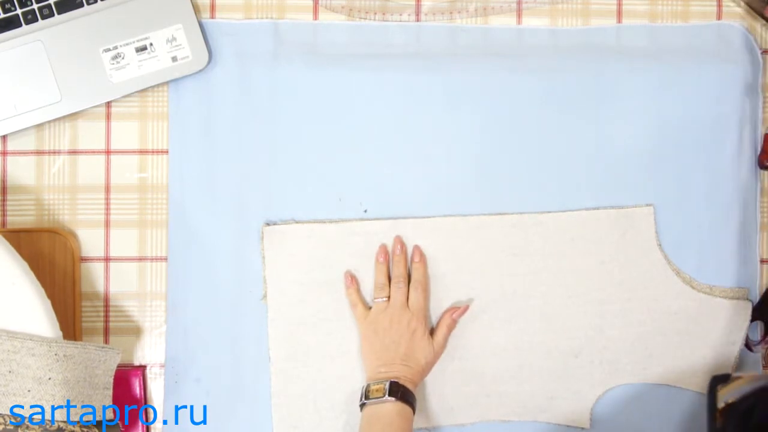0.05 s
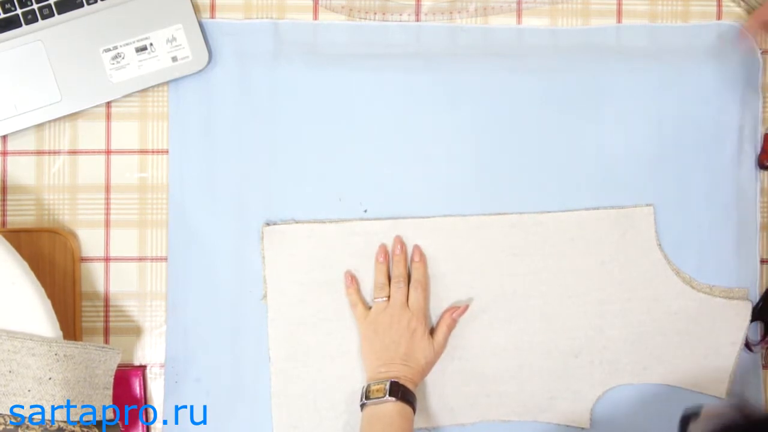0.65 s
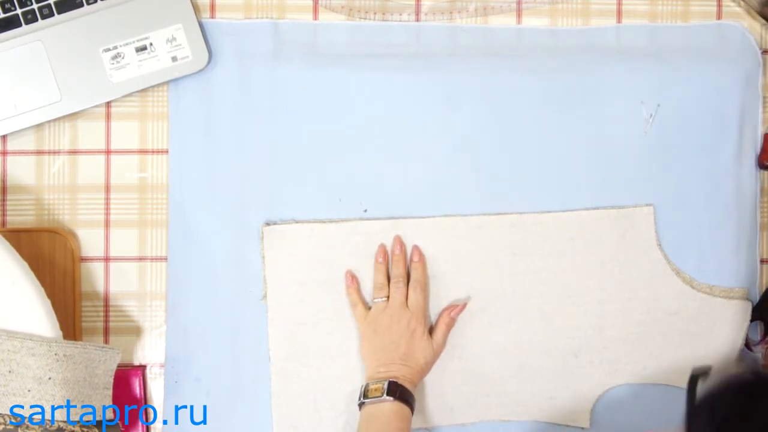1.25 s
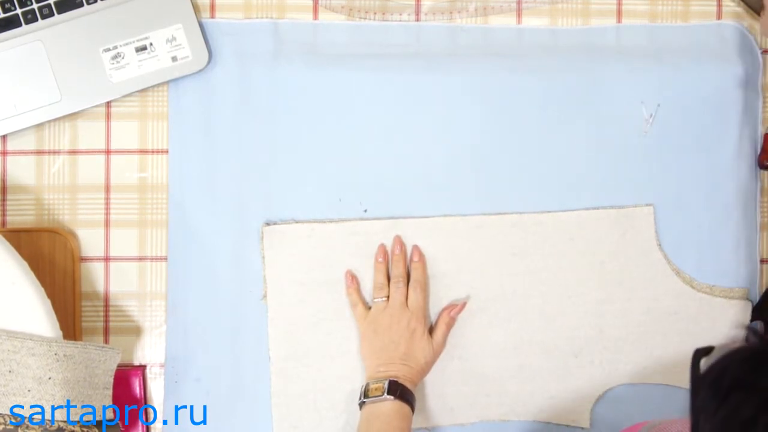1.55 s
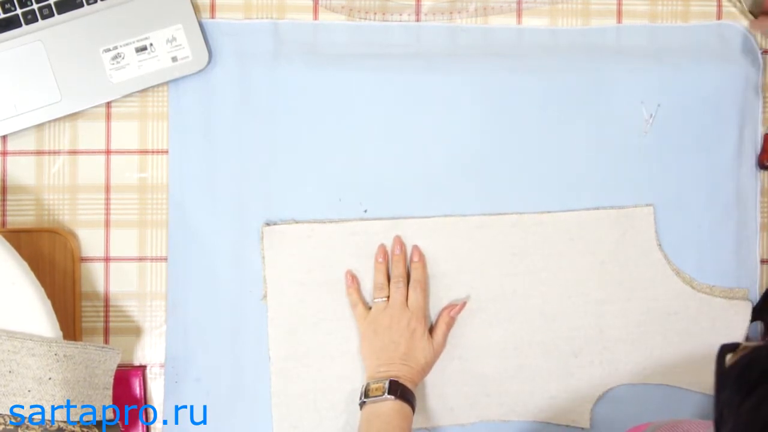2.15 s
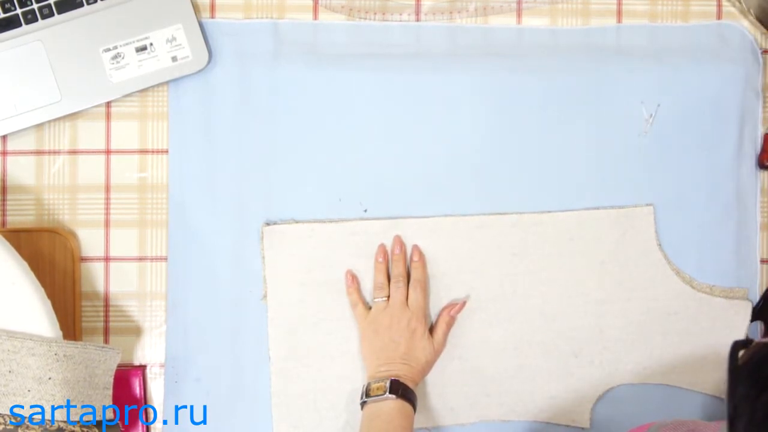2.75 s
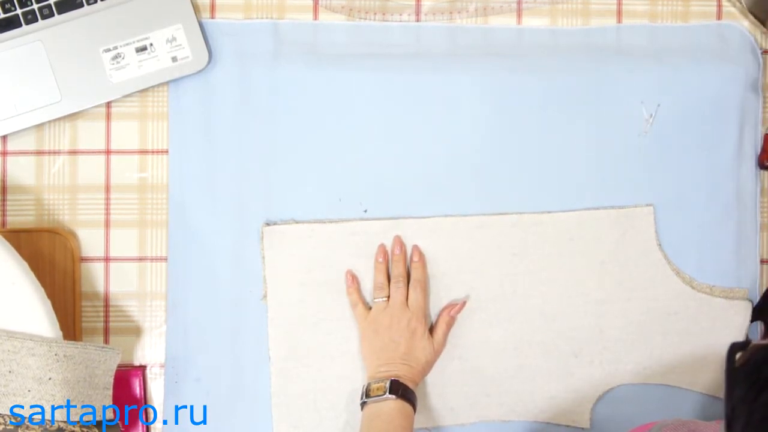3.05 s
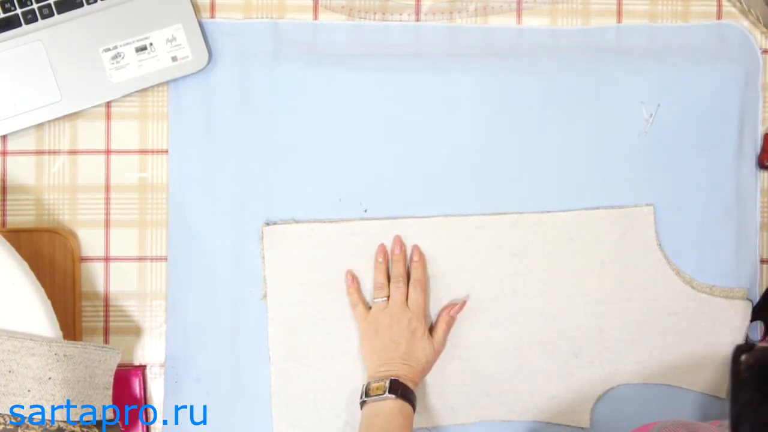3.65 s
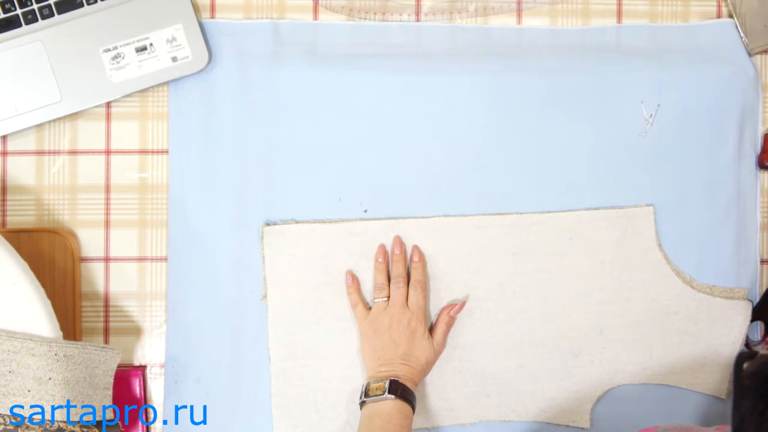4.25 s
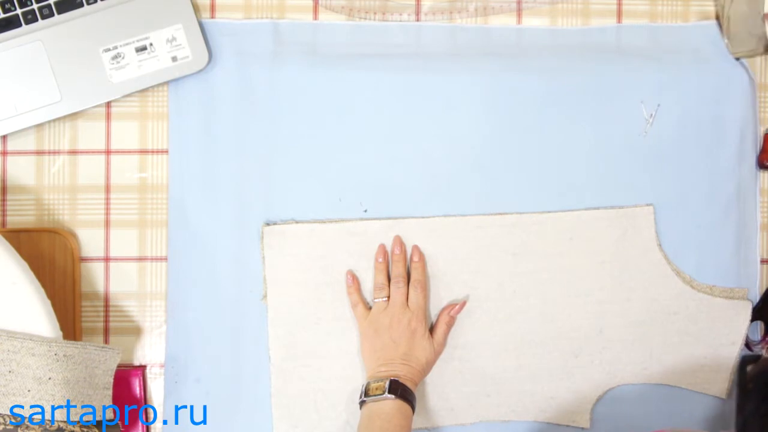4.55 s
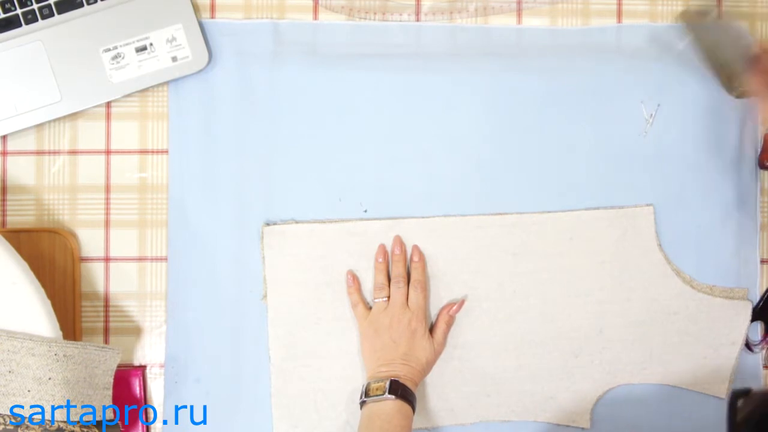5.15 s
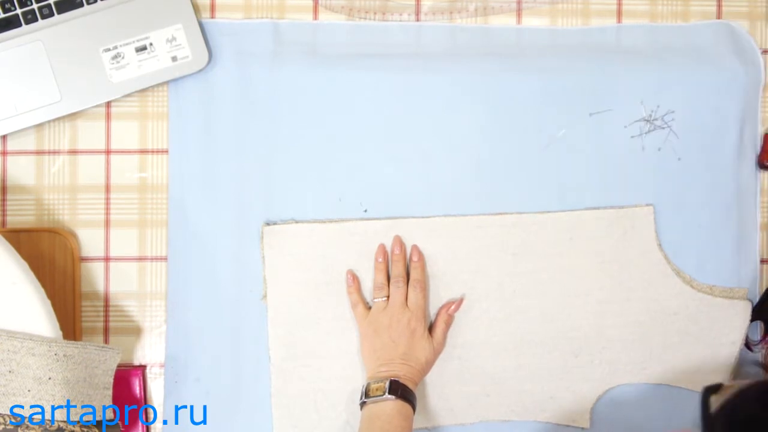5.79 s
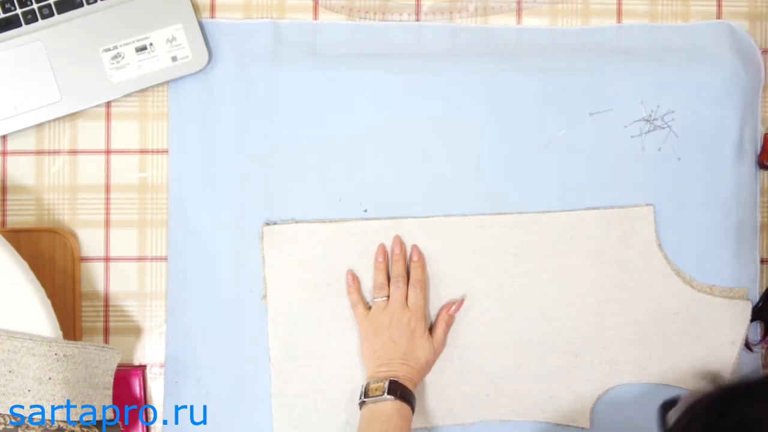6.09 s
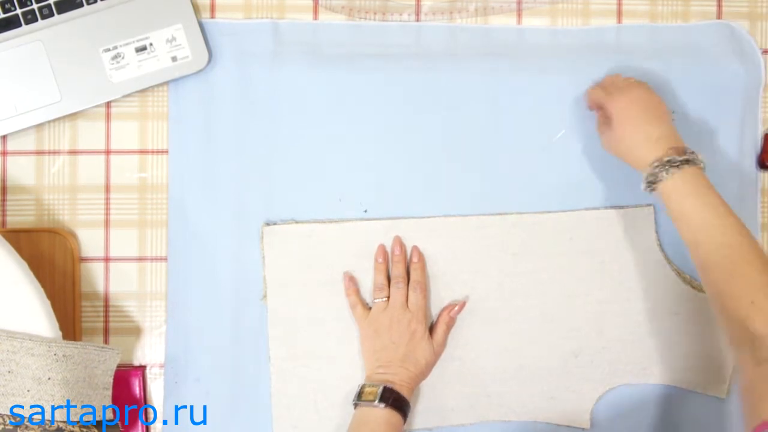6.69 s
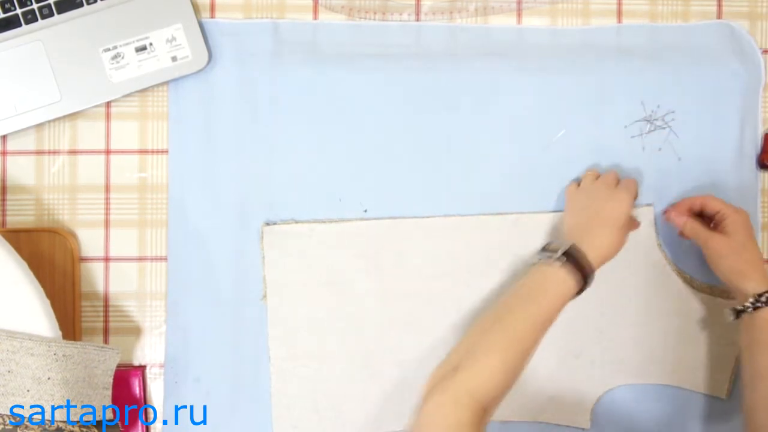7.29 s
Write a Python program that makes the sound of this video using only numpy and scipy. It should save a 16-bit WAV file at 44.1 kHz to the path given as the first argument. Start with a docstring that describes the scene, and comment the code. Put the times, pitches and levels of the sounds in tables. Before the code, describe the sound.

Pins jingle in a handled tin, with sharp lid snaps, dull table knocks and faint cloth brushing in a quiet room.

```python
"""Pin tin on a sewing table

In a small room, a hand gropes for a tin of pins on a cloth-covered table, right of the microphone.
Things clink, slide and knock; the tin is opened, shaken out, closed and set down ringing.
Then hands brush the cloth. Blows are noise bursts and decaying modes; friction is swelling noise.
Low hiss and room rumble lie underneath."""
import sys
import numpy as np
from scipy import signal
from scipy.fft import rfft, irfft, next_fast_len
from scipy.io import wavfile
from scipy.ndimage import map_coordinates

SR = 44100
rng = np.random.default_rng(int(sys.argv[2]) if len(sys.argv) > 2 else 0)


def bounce(signal):
    """Save signal as a 16-bit WAV file at the path given by the first command-line argument."""
    frames = np.transpose(np.atleast_2d(signal))
    limited = np.clip(frames, -1, 1)
    pcm = np.round(limited * 32767).astype(np.int16)
    wavfile.write(sys.argv[1], SR, pcm)


N = 327504

# likeness of left and right in reflected sound: (frequency [Hz], correlation [-1..1])
CORRELATION = [(100, 0.83), (500, 0.87), (1200, 0.34), (2500, -0.29), (10000, -0.24)]


def amp(db):
    return 10 ** (np.asarray(db) / 20)


def unit_rms(x):
    return x / np.sqrt(np.mean(x ** 2) + 1e-20)


def attack(t, rise_s):
    return 1 - np.exp(-t / rise_s)


def curve(points, hz):
    """Interpolate (Hz, value) points on a log axis."""
    knots_hz, values = np.transpose(points)
    return np.interp(np.log(hz + 1), np.log(knots_hz + 1), values)


def filtered(x, response):
    """FFT filter of gain response(Hz)."""
    n = x.shape[-1]
    size = next_fast_len(n + SR // 4)
    return irfft(rfft(x, size) * response(np.fft.rfftfreq(size, 1 / SR)), size)[..., :n]


def causal_eq(x, gain_db, size=2048):
    """Minimum-phase filter of gain_db(Hz); attacks stay sharp."""
    cepstrum = irfft(np.log(amp(gain_db(np.fft.rfftfreq(size, 1 / SR)))))
    cepstrum[1:size // 2] *= 2
    cepstrum[size // 2 + 1:] = 0
    impulse = irfft(np.exp(rfft(cepstrum)))
    return signal.fftconvolve(x, impulse[None], axes=1)[:, :x.shape[1]]


def white_pair(n):
    """White stereo noise, correlated like reflected sound."""
    def mid_side_gains(hz):
        angle = np.arccos(curve(CORRELATION, hz)) / 2
        return np.array([np.cos(angle), np.sin(angle)])
    mid, side = filtered(rng.standard_normal((2, n)), mid_side_gains)
    return np.array([mid + side, mid - side])


def noise(spectrum):
    """Coloured stereo noise, rms 1."""
    return unit_rms(filtered(white_pair(N), lambda hz: amp(curve(spectrum, hz))))


def wobble(knots_per_s):
    """Smooth random curve."""
    knots = rng.standard_normal(int(N * knots_per_s / SR) + 4)
    return map_coordinates(knots, [np.arange(N) * knots_per_s / SR])


def add(track, start_s, sound):
    i = round(start_s * SR)
    track[:, i:i + sound.shape[1]] += sound[:, :N - i]


def room_tail(rise_s=0.0039):
    """Fresh stereo room response; treble dies first."""
    # room decay: (frequency [Hz], t60 [s])
    decay = [(100, 0.94), (300, 0.34), (800, 0.34), (2500, 0.38), (6000, 0.22), (12000, 0.28)]
    hz, t, spectra = signal.stft(white_pair(SR // 2), SR, nperseg=256)
    spectra = spectra * amp(-60 * t / curve(decay, hz)[:, None]) * attack(t, rise_s)
    tail = signal.istft(spectra, SR, nperseg=256)[1][:, :SR // 2]
    return tail / np.linalg.norm(tail[0])


def in_room(x, room_db):
    return x + amp(room_db) * signal.fftconvolve(x, room_tail(), axes=1)[:, :N]


def ringing(modes, t, scatter_db=1.4, grip_detune=0.001):
    """Modes struck at random strengths, detuned by the grip; each lags on the left."""
    hz, db, t60_s = np.transpose(modes)[:, :, None]
    hz = hz * (1 + grip_detune * rng.standard_normal(hz.shape))
    gains = amp(db + scatter_db * rng.standard_normal(db.shape))
    lag_rad = rng.random(db.shape) * np.minimum(hz / 1700, 1.5)
    phase = 2 * np.pi * rng.random(db.shape) + np.array([-lag_rad, lag_rad])
    partials = gains * amp(-60 * t / t60_s) * np.sin(2 * np.pi * hz * t + phase)
    return partials.sum(axis=1) / np.linalg.norm(gains)


def contact(band_db, shape, t60_s, room_db, rise_s, crack_gain, modes=None, ring_db=0):
    """One blow: cracks, fast-dying clatter, room and optional ring, coloured by what was hit."""
    # thud, body, treble and sparkle bands: (low edge [Hz], high edge [Hz])
    bands = [(150, 800), (800, 2500), (2500, 7000), (7000, 13000)]
    t = np.arange(SR // 2) / SR
    envelope = amp(-60 * t / t60_s) * attack(t, rise_s) ** 2
    blow = white_pair(len(t)) * envelope / envelope.max()
    # parts chatter; each crack reaches the left 3 samples late
    cracks_s = rng.uniform([0.0008, 0.002, 0.003], [0.0018, 0.004, 0.006])
    for i, gain in zip((cracks_s * SR).astype(int), crack_gain * np.array([1, -0.7, 0.5])):
        blow[1, i] += gain
        blow[0, i + 3] += gain
    strength = np.linalg.norm(blow[0])
    blow = blow + amp(room_db) * strength * room_tail()
    # each contact point favours its own short-lived resonances
    grid_hz = np.arange(0, SR / 2, 130)
    ripple_db = 2.5 * rng.standard_normal(1024)[:len(grid_hz)]
    blow = causal_eq(blow, lambda hz: np.interp(hz, grid_hz, ripple_db) * np.minimum(hz / 1000, 1))
    if modes is not None:
        ring = ringing(modes, t) * attack(t, rise_s)
        blow = blow + amp(ring_db) * strength * ring / np.linalg.norm(ring[0])
    density = [(np.sqrt(lo * hi), db - 10 * np.log10(2 * (hi - lo) / SR))
               for (lo, hi), db in zip(bands, band_db)]
    return causal_eq(blow, lambda hz: curve(density, hz) + curve(shape, hz))


def background(gain_db=-57.5):
    """Steady, wide room rumble, slightly stronger on the right, and microphone hiss."""
    # noise floor: (frequency [Hz], density [dB])
    spectrum = [(15, -46.5), (25, -23), (64, -9), (110, -8), (169, -3.5), (285, -3), (456, -4.5), (950, -7),
                (1780, -11), (2850, -13.5), (11100, -19.5), (13000, -27.5)]
    # stereo width: (frequency [Hz], side over mid [dB])
    width = [(60, 1), (150, 4), (370, 5.5), (900, 3.5), (2220, 2.5), (5480, 0.5), (13500, -1.5)]
    # balance: (frequency [Hz], left over right [dB])
    lean = [(60, -0.5), (370, -2), (2220, -0.5), (13500, 0)]
    mid, side = unit_rms(filtered(rng.standard_normal((2, N)), lambda hz: amp(curve(spectrum, hz))))
    side = filtered(side, lambda hz: amp(curve(width, hz)))
    stereo = np.array([mid + side, mid - side])
    return amp(gain_db) * filtered(stereo, lambda hz: amp(np.outer([0.5, -0.5], curve(lean, hz))))


def metal_slides(rise_share=0.46, grain_db=4):
    """Sliding metal and jostling pins catch in tiny slips that swell and fade."""
    # slides: (peak time [s], level [dB], length [s])
    slides = [(0.012, -45.5, 0.031), (0.222, -35.5, 0.066), (0.31, -34.5, 0.061), (1.228, -52, 0.014),
              (1.33, -47, 0.019), (1.533, -46, 0.045), (1.604, -33.5, 0.026), (1.69, -37, 0.09),
              (2.823, -33.5, 0.046), (3.478, -43, 0.014), (4.463, -48.5, 0.042), (4.599, -31.5, 0.012),
              (5.188, -53, 0.084), (5.26, -49, 0.039), (5.346, -48.5, 0.029), (5.411, -54, 0.02),
              (6.015, -39, 0.031), (6.604, -48.5, 0.014)]
    # metal friction: (frequency [Hz], density [dB])
    spectrum = [(100, -22), (350, 1.5), (800, -3), (1500, -2.5), (3200, -1.5), (5500, -0.5), (8000, -2.5),
                (10500, -3.5), (13000, -13)]
    t = np.arange(N) / SR
    swell = lambda u: np.exp(-np.maximum(-u / rise_share, u / (1 - rise_share)).clip(0, 30))
    envelope = sum(amp(db) * swell((t - peak_s) / length_s) for peak_s, db, length_s in slides)
    slips = unit_rms(noise(spectrum) * amp(grain_db * wobble(900)))
    return in_room(envelope * slips, room_db=-4)


def table_bumps(thud_t60_s=0.17, cutoff_hz=420, sway_hz=67, sway_t60_s=0.81):
    """Soft blows excite only the table's low resonances and the sway of its whole top."""
    # bumps: (time [s], thud gain [dB], sway gain [dB])
    bumps = [(0.015, -60, -69), (0.16, -43, -57.5), (1.27, -37.5, -52), (1.69, -43.5, -71),
             (2.813, -62, -62), (2.974, -51, -81), (3.406, -51, -74), (3.607, -43, -67), (3.738, -44, -70),
             (4.15, -47, -76), (4.676, -41.5, -80), (5.809, -36, -70), (5.95, -34.5, -61),
             (6.017, -27, -49.5), (6.44, -51, -55), (6.494, -57, -72)]
    # table-top modes: (frequency [Hz], width [Hz], gain [dB])
    modes = [(372, 140, 15), (515, 31, 20.5), (590, 51, -6), (870, 26, 24.5), (1110, 34, 0)]

    def padded_wood(hz):
        wood = sum((-1) ** k * amp(db) * 1j * hz * width / (centre ** 2 - hz ** 2 + 1j * hz * width)
                   for k, (centre, width, db) in enumerate(modes))
        return wood / (1 + 1j * hz / cutoff_hz) ** 3

    out, t = np.zeros((2, N)), np.arange(SR) / SR
    sway = np.sin(2 * np.pi * sway_hz * t) * amp(-60 * t / sway_t60_s) * attack(t, 0.0098)
    for start_s, thud_db, sway_db in bumps:
        thud = filtered(white_pair(len(t)) * amp(-60 * t / thud_t60_s), padded_wood)
        add(out, start_s, amp(thud_db - 2) * 2 * thud / np.abs(thud).max() + amp(sway_db - 1) * sway)
    return out


def metal_clicks(hits, modes, rise_s, crack_gain, room_db=-2.5):
    """Hard clicks with a thin ring; brighter ones have more sparkle, less body."""
    # click colour: (frequency [Hz], gain [dB])
    shape = [(50, -28), (110, -3.5), (220, 4), (380, 5.5), (800, -2.5), (1300, -2.5), (2100, 0.5),
             (3300, -1), (4300, -3), (6200, 2), (8000, 1), (10500, 3), (12300, -9)]
    out = np.zeros((2, N))
    for start_s, db, thud_db, bright_db, t60_s, ring_db in hits:
        band_db = db + np.array([thud_db, -17.5 - 0.58 * bright_db, 0, bright_db - 10])
        add(out, start_s, contact(band_db, shape, t60_s, room_db, rise_s, crack_gain, modes, ring_db))
    return out


def tin_clinks():
    """Steel strikes the hand-held tin."""
    # clinks: (time [s], gain [dB], relative thud [dB], brightness [dB], t60 [s], relative ring [dB])
    clinks = [(0.032, -37, -12, -2.5, .06, -16), (0.136, -35, -13, -5.5, 0.13, -5),
              (0.183, -39.5, -27, 8, .1, -15), (0.226, -16.5, -33, -2, 0.026, -6),
              (0.290, -15.5, -20.5, -4, 0.036, -13), (0.461, -50, -32, 13.5, 0.21, 0),
              (1.268, -29.5, -10, -0.5, 0.11, -1.5), (1.304, -26, -23, -8, 0.097, -7),
              (1.360, -33, -14, -4.5, .047, -9), (1.455, -32, -16.5, -7, 0.043, -17),
              (1.605, -15.5, -42, -11, 0.09, -6), (1.641, -8, -33, -3.5, 0.026, -8.5),
              (1.681, -18, -22.5, 6.5, 0.044, -19), (1.791, -34.5, -31, 13, 0.029, -14),
              (2.038, -40.5, -28, -4, 0.047, -7), (2.296, -34.5, -45, -6.5, 0.093, -2.5),
              (2.335, -20, -48, -7.5, 0.033, -9.5), (2.727, -33, -18, -6.5, 0.066, -13),
              (2.794, -25.5, -19, 1.5, 0.044, -9), (2.814, -26, -12, -8, 0.092, -11),
              (2.951, -41.5, -11, -2, 0.04, -7), (3.100, -48.5, -17, 4, .046, -4),
              (3.694, -21, -30, 0.5, 0.029, -17.5), (3.853, -45, -13, 0, 0.11, 0),
              (3.901, -47.5, -23, 10, 0.041, -12), (4.035, -33, -16, 3, .038, -22),
              (4.198, -38.5, -4, -2, 0.027, -12), (5.068, -34.5, -23, 6, .025, -11),
              (5.237, -28, -33, 10, 0.047, -1), (6.141, -33, -2, 3, 0.015, -16),
              (6.581, -48, -17, 6.5, .06, -8)]
    # held-tin modes: (frequency [Hz], gain [dB], t60 [s])
    modes = [(1540, -9, 0.27), (2048, 3.5, 0.31), (2570, 4.5, 0.2), (2830, 6, 0.069), (3300, 8.5, 0.072),
             (3660, 12.5, 0.063), (4830, 6.5, 0.16), (5750, -4, .2), (6720, -3.5, 0.32), (9800, 1.5, 0.25),
             (11000, 6, .12), (11575, 11, 0.25)]
    return amp(-4) * metal_clicks(clinks, modes, rise_s=0.0012, crack_gain=1.6)


def pin_tinkles(low_hz=8700, high_hz=12000, t60_s=0.16, count=13):
    """Loose pins collide; each rings at its own high note."""
    # tinkles: (time [s], level [dB])
    tinkles = [(0.295, -24), (1.728, -35), (1.793, -49), (2.846, -35), (3.478, -44.5), (4.247, -51),
               (5.32, -47), (5.352, -47)]
    out, t = np.zeros((2, N)), np.arange(SR // 2) / SR
    for start_s, db in tinkles:
        pins = [(hz, 0, t60_s) for hz in rng.uniform(low_hz, high_hz, count)]
        add(out, start_s, amp(db) * ringing(pins, t) * attack(t, 0.00044))
    return out


def steel_shimmer(rise_s=0.027):
    """A faint, high steel ring builds after a hard jolt and lingers."""
    # jolts: (time [s], level [dB])
    jolts = [(0.3, -51), (3.41, -57), (6.02, -56)]
    # steel modes: (frequency [Hz], gain [dB], t60 [s])
    modes = [(10000, 2, 1.3), (10100, 0, 1.4), (10200, 1, 1.5), (10450, 0, 1.2)]
    out, t = np.zeros((2, N)), np.arange(SR) / SR
    for start_s, db in jolts:
        add(out, start_s, amp(db) * ringing(modes, t) * attack(t, rise_s))
    return out


def cloth_strokes(swish_db=-9, hiss_db=-2, grain_db=1.5):
    """A hand or sleeve speeds up and slows over the cloth; the weave catches unevenly."""
    # strokes: (peak time [s], Gaussian sigma [s], gain [dB])
    strokes = [(0.81, 0.075, -49.5), (3.85, 0.099, -51.5), (4.12, 0.097, -57), (4.262, 0.023, -51.5),
               (4.4, 0.018, -55), (4.52, .04, -55), (7.197, 0.13, -58.5)]
    # soft swish: (frequency [Hz], density [dB])
    swish = [(60, -10), (200, -5), (400, -4.5), (800, -20), (1600, -3), (3500, -6), (9000, -42)]
    # crisp hiss: (frequency [Hz], density [dB])
    hiss = [(300, -38), (1500, 2), (3500, 12), (7000, 10), (11000, 10), (13000, -11)]
    t = np.arange(N) / SR
    speed = sum(amp(db) * np.exp(-((t - peak_s) / sigma_s) ** 2 / 2) for peak_s, sigma_s, db in strokes)
    catches = unit_rms(amp(grain_db * wobble(120)))
    return speed * catches * (amp(swish_db) * noise(swish) + amp(hiss_db) * noise(hiss))


def table_knocks(gain_db=-4):
    """Things land dully on the padded table; harder contact gives more treble."""
    # knocks: (time [s], gain [dB], relative thud [dB], hardness [dB], t60 [s])
    knocks = [(1.395, -32.5, -27, -10, .1), (2.605, -23, -13, 8, 0.087), (2.693, -29, -12.5, -17, 0.28),
              (3.393, -21.5, -19, 0, .05), (3.399, -14, -12, -11, 0.091), (4.038, -35, -15, -28, .12),
              (4.674, -29, -9, -20, 0.14), (5.948, -27, -13.5, -16.5, 0.29), (6.018, -25, 0.5, 2, 0.17)]
    # knock colour: (frequency [Hz], gain [dB])
    shape = [(50, -29), (120, -18), (220, -10), (350, 2), (500, -2), (630, 5.5), (800, -5), (1150, -2.5),
             (1600, -6.5), (2100, 0.5), (2900, -4.5), (4000, -9.5), (9000, -5.5), (12500, -15)]
    out = np.zeros((2, N))
    for start_s, db, thud_db, hardness_db, t60_s in knocks:
        band_db = db + np.array([thud_db, 0, hardness_db, 0.48 * hardness_db - 11])
        add(out, start_s, contact(band_db, shape, t60_s, room_db=-1, rise_s=0.00078, crack_gain=4.5))
    return amp(gain_db) * out


def lid_snaps():
    """The lid pops off and snaps back on, ringing each time."""
    # snaps: (time [s], gain [dB], relative thud [dB], brightness [dB], t60 [s], relative ring [dB])
    snaps = [(4.592, -15.5, -20, 6, 0.016, -7), (5.802, -18, -17.5, -6, 0.048, -2.5)]
    # lid modes: (frequency [Hz], gain [dB], t60 [s])
    modes = [(1313, -16, 0.66), (1516, -1, 0.19), (1975, -5.5, 0.25), (2500, -25, 0.22), (2882, -0.5, 0.15),
             (2750, -19, 0.17), (4080, -10, 0.25), (4800, 3, 0.067), (4770, 9, 0.057), (6494, 3, 0.07),
             (7440, 1, 0.08), (9146, -21, 0.16), (10600, -20, 0.17), (11350, 10.5, 0.063)]
    return amp(-3) * metal_clicks(snaps, modes, rise_s=0.0011, crack_gain=1.1)


def tin_landing(rise_s=0.0033):
    """The tin lands flat, rocks once and rings freely."""
    # touchdowns: (time [s], level [dB])
    landings = [(6.019, -20), (6.089, -30)]
    # standing-tin modes: (frequency [Hz], gain [dB], t60 [s])
    modes = [(204, -9.5, 0.19), (333, -7.5, 0.19), (490, -2, 0.2), (843, 2, 0.11), (937, -7, 0.2),
             (1170, -4, .25), (1785, -7, 0.44), (2000, 0.5, 0.18), (2125, -1, .22), (2320, -5, 0.26),
             (2647, -2, .24), (2860, 1.5, 0.26), (3016, 6, 0.19), (3530, -10, .24), (3560, -9, 0.3),
             (4080, -11.5, .26), (4650, 0.5, 0.14), (5000, -4, 0.088), (5540, -12, .22), (6900, -5, 0.16)]
    out, t = np.zeros((2, N)), np.arange(SR) / SR
    for start_s, db in landings:
        add(out, start_s, amp(db) * ringing(modes, t) * attack(t, rise_s))
    return in_room(out, room_db=-9)


def finger_skid(peak_s=7.225, sigma_s=0.04, gain_db=-53):
    """Fingers skid over taut cloth with a short, hollow rub."""
    # (frequency [Hz], density [dB])
    hollow = [(500, -35), (780, 2), (920, 1), (1150, -30), (1450, 0), (1900, -9), (3500, -37)]
    t = np.arange(N) / SR
    return amp(gain_db) * np.exp(-((t - peak_s) / sigma_s) ** 2 / 2) * noise(hollow)


def scene():
    """Handling on the right; the left microphone is shaded most in the treble."""
    # (frequency [Hz], left cut and right boost [dB])
    shade = [(200, 0.35), (900, 0.37), (2500, 1.07), (10000, 1.22)]
    metal = tin_clinks() + lid_snaps() + tin_landing() + pin_tinkles() + steel_shimmer() + metal_slides()
    handling = metal + table_knocks() + table_bumps() + cloth_strokes() + finger_skid()
    return filtered(handling, lambda hz: amp(np.outer([-1, 1], curve(shade, hz)))) + background()


def record(dry):
    """Steep low-pass."""
    cutoff_hz = 13000
    return filtered(dry, lambda hz: 1 / np.sqrt(1 + (hz / cutoff_hz) ** 150))


dry = scene()
out = record(dry)
bounce(out)
```